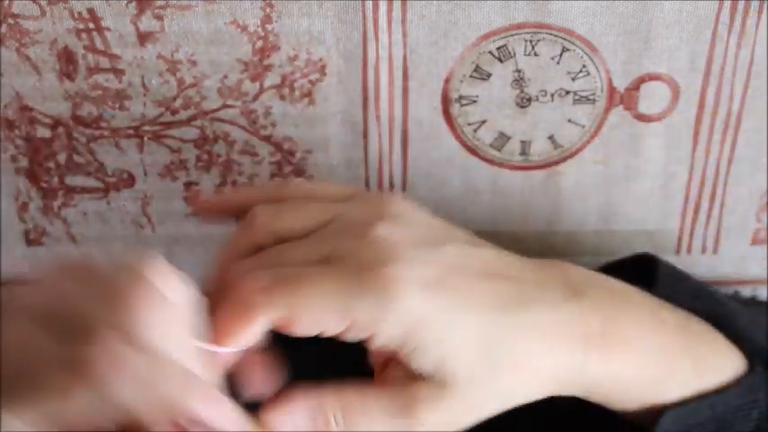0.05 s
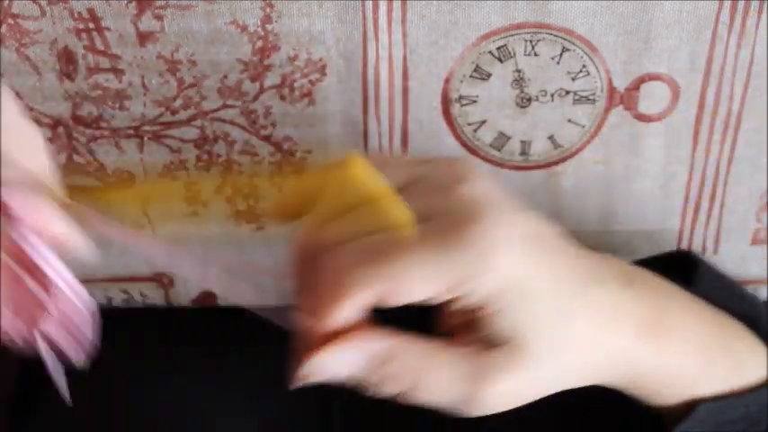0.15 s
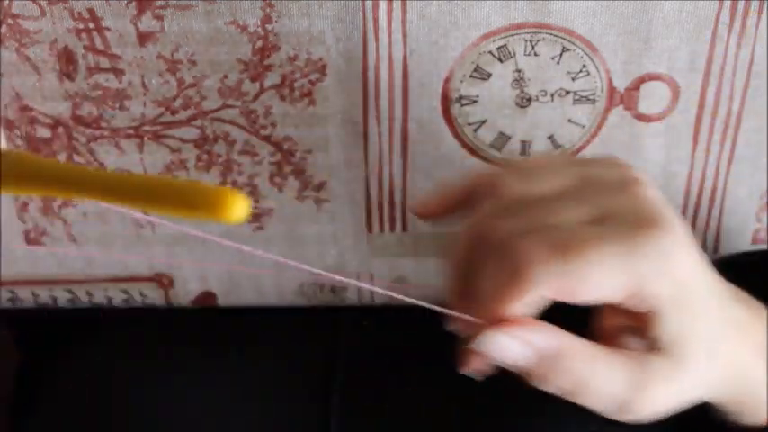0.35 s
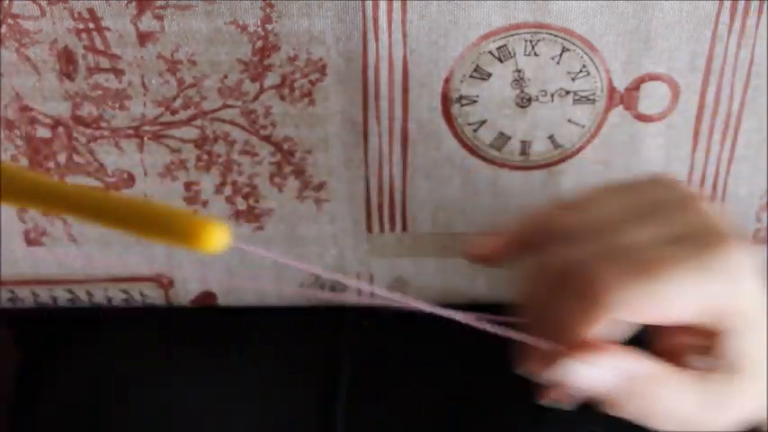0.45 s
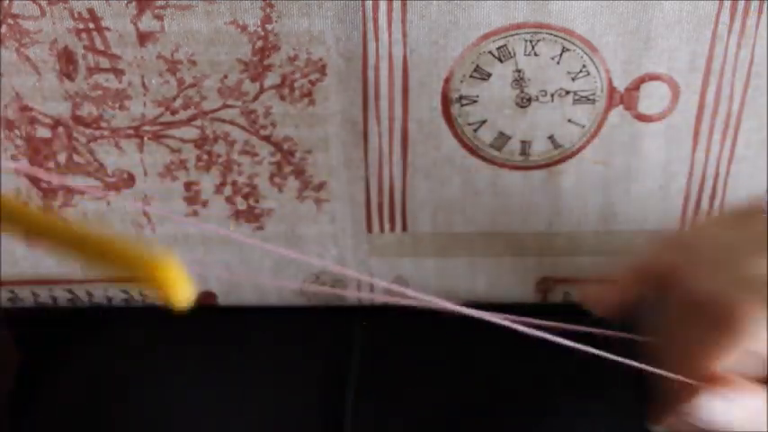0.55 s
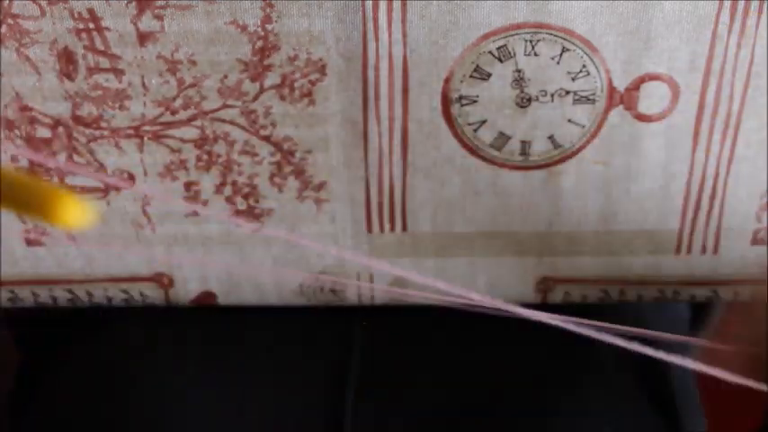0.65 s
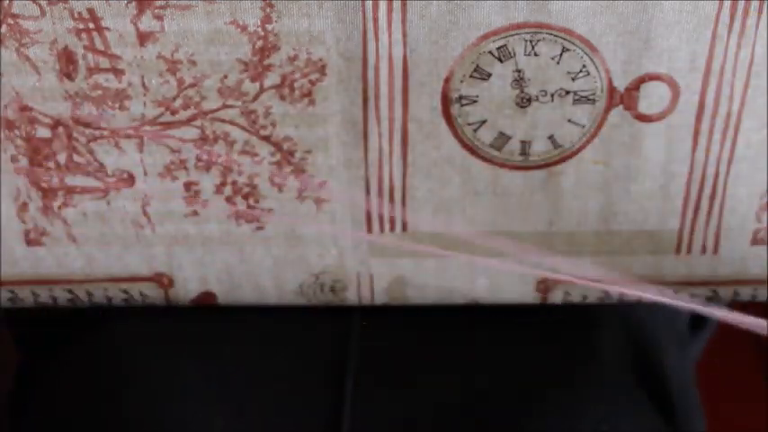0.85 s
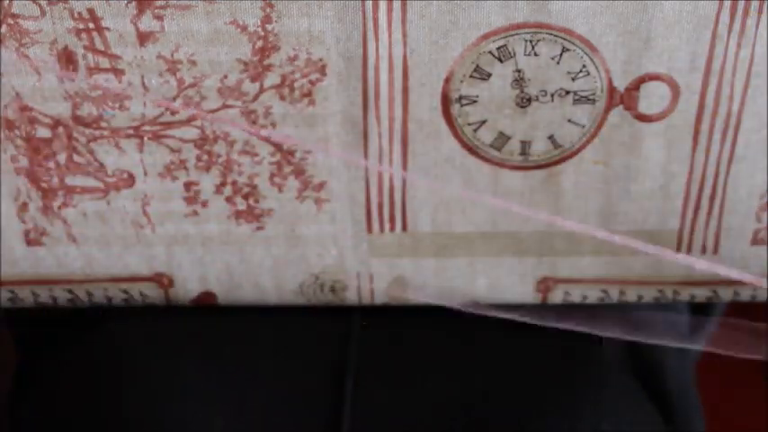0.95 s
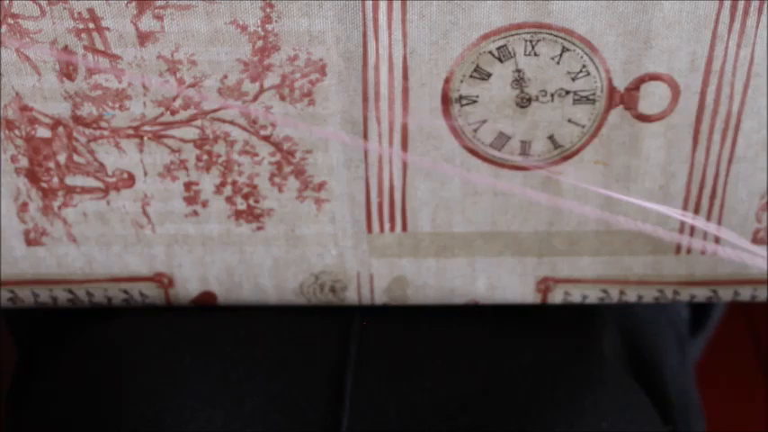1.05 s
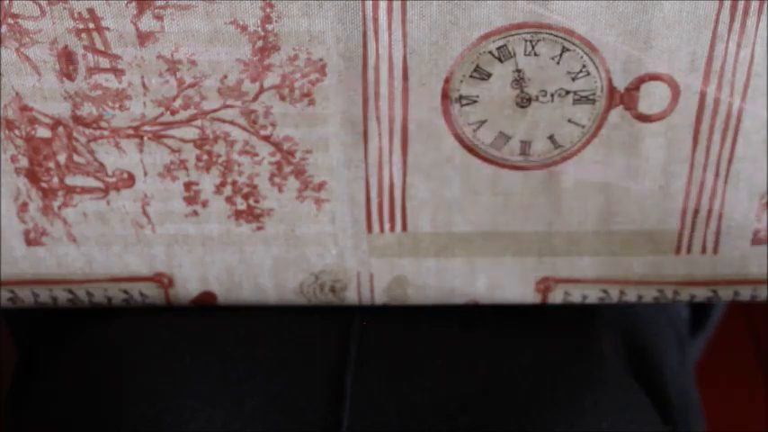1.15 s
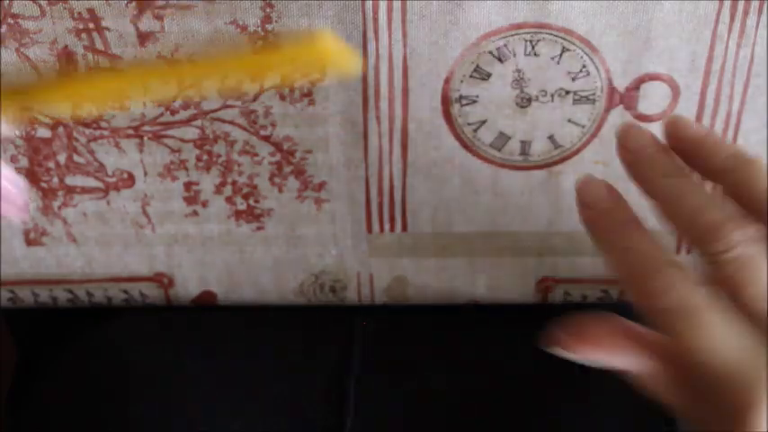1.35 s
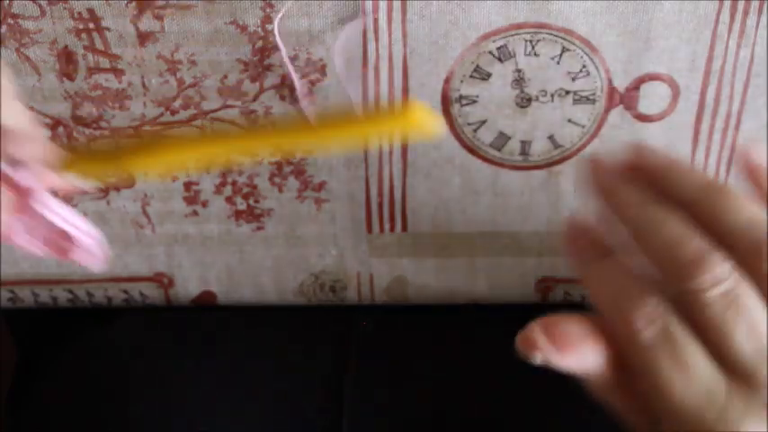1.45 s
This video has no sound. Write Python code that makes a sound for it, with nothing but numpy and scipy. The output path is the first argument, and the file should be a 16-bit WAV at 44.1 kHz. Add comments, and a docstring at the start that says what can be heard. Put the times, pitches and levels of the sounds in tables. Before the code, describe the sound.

Hands bump a cloth-covered table with dull thuds that grow weaker, while yarn slides softly through the fingers. A crochet hook clicks faintly near the end, over the steady hiss of a small room.

```python
"""Yarn is pulled off a ball at a cloth-covered table in a small room.
From the start, over steady hiss, the strand rubs softly through the fingers. Skin and yarn scuff the
cloth and the crochet hook ticks faintly. From a quarter second on, hands bump the table: dull thuds
that the walls throw back and the room's low modes hold. The bumps grow weaker, the pull fades,
and near the end the hook gives its clearest clicks."""
import sys
import numpy as np
from scipy import signal
from scipy.fft import rfft, irfft
from scipy.io import wavfile
from scipy.ndimage import uniform_filter1d

SR = 44100
rng = np.random.default_rng(int(sys.argv[2]) if len(sys.argv) > 2 else 0)


def waveform_to_disk(signal):
    """Save audio, clipped to [-1, 1], as 16-bit WAV at the path in sys.argv[1]."""
    frames = np.transpose(np.atleast_2d(signal))
    scaled = np.clip(frames, -1, 1) * 32767
    samples = np.round(scaled).astype(np.int16)
    wavfile.write(sys.argv[1], SR, samples)


N = 66150


def amp(db):
    """Decibels to gain."""
    return 10 ** (np.asarray(db) / 20)


def unit(x):
    """Scales to an rms of one."""
    return x / np.sqrt(np.mean(x ** 2) + 1e-20)


def read(points, hz):
    """Reads a table on a log-frequency axis."""
    f, value = np.transpose(points)
    return np.interp(np.log(hz + 1), np.log(f + 1), value)


def level(points):
    """A fader ride: gain over time from (t/s, level/dB) points."""
    return amp(np.interp(np.arange(N) / SR, *np.transpose(points)))


def add(mix, s, sound):
    """Mixes a sound in at time s."""
    part = mix[max(round(s * SR), 0):][:len(sound)]
    part += sound[:len(part)]


def noise(colour):
    """Steady noise with the given spectrum."""
    gain = amp(read(colour, np.fft.rfftfreq(N, 1 / SR)))
    return unit(irfft(rfft(rng.standard_normal(N)) * gain, N))


# Tone of the room's air: f/Hz, level/dB
HISS_COLOUR = [(15, -43), (28, -20), (42, 2.5), (60, 2.5), (100, 0), (150, -8), (210, -4.5), (300, -6),
               (550, -7.5), (820, -6.5), (1400, -14), (2500, -20.5), (4200, -21.5), (7000, -29),
               (12000, -36.5), (15500, -41.5)]
# Its fader ride: t/s, level/dB
HISS_LEVEL = [(0, -52.5), (.8, -51.5), (1.15, -52.5), (1.5, -50)]


def hiss():
    """The room's air lays a steady bed of dark noise."""
    return level(HISS_LEVEL) * noise(HISS_COLOUR)


# Swell and fade of the pull: t/s, level/dB
YARN_LEVEL = [(0, -62), (.1, -59.5), (.2, -58.5), (.42, -56), (.55, -55.5), (.7, -57), (.9, -57.5),
              (1.08, -57.5), (1.18, -65.5), (1.5, -69.5)]
# Airy tone of the sliding strand: f/Hz, level/dB
YARN_COLOUR = [(300, -28), (1200, -3), (2500, 6), (4500, 1.5), (7000, 0.5), (10000, -1), (13000, -4.5),
               (15500, -12)]


def yarn():
    """The strand rubs through the fingers in one long pull."""
    return level(YARN_LEVEL) * fibres(YARN_COLOUR)


def fibres(colour, grain_s=0.0015, grain_db=1.5):
    """Catching fibres give friction noise a fine grain."""
    grain = unit(uniform_filter1d(rng.standard_normal(N), max(round(grain_s * SR), 1)))
    return unit(noise(colour) * amp(grain_db * grain))


# Scuff cues: t/s, level/dB, attack/s, decay/s
SCUFFS = [(0.121, -53.5, 0.0096, 0.01), (0.2407, -42, 0.0011, 0.009), (.326, -50, 0.011, 0.045),
          (0.3291, -43.5, 0.0013, 0.0038), (1.236, -52, .005, 0.005), (1.459, -50.5, 0.0085, 0.024)]
# Tone of the rubbed cloth: f/Hz, level/dB
CLOTH_COLOUR = [(200, -12), (700, 10.5), (1300, 7.5), (1900, 7.5), (2800, 1.5), (4700, 6), (6000, 0),
                (10000, -4), (15500, -49)]


def cloth_scuffs(wet_db=-5):
    """Skin and yarn brush the cloth in short strokes that rise and die away."""
    t, pressure = np.arange(SR // 2) / SR, np.zeros(N)
    for s, db, attack, decay in SCUFFS:
        envelope = np.minimum(t / attack, 1) * np.exp(-np.maximum(t - attack, 0) / decay)
        add(pressure, s, amp(db) * envelope)
    scuffs = pressure * fibres(CLOTH_COLOUR)
    return scuffs + amp(wet_db) * room_tail(scuffs)


# Reverb time of the room: f/Hz, t60/s
ROOM_T60 = [(100, 0.28), (300, 0.62), (600, 0.38), (1200, 0.9), (4000, 0.32), (12000, 0.1)]


def room_tail(x, predelay_s=0.0084):
    """Diffuse reverb fades in, then each band dies at its own speed."""
    hz, t, bands = signal.stft(rng.standard_normal(SR), SR, nperseg=256)
    bands = bands * np.exp(-np.log(1000) * t / read(ROOM_T60, hz)[:, None])
    tail = signal.istft(bands, SR, nperseg=256)[1]
    tail = tail * np.clip(np.arange(len(tail)) / SR / predelay_s - .5, 0, 1)
    return signal.fftconvolve(x, tail / np.linalg.norm(tail))[:N]


# Click cues: t/s, level/dB
CLICKS = [(.1285, -44), (.1315, -44), (.1385, -49), (1.3982, -49), (1.4093, -43), (1.4107, -31),
          (1.4135, -40), (1.4372, -37), (1.4822, -47)]
# Ring of the hook: f/Hz, level/dB, t60/s
HOOK_MODES = [(2950, -11, .01), (3830, 0, .011), (4440, -18, .04), (8500, -15, .005)]


def hook_clicks(snap_db=-11, snap_decay_s=0.0009, wet_db=-6):
    """Each tap of the hook is a tiny snap of noise and a short, bright ring."""
    t, clicks = np.arange(SR // 20) / SR, np.zeros(N)
    for s, db in CLICKS:
        snap = amp(snap_db) * rng.standard_normal(len(t)) * np.exp(-t / snap_decay_s)
        add(clicks, s, amp(db) * (ring(HOOK_MODES, t) + snap))
    clicks = soften(radiate(clicks, hz=2370), hz=10400, order=10)
    return clicks + amp(wet_db) * room_tail(clicks)


def ring(modes, t):
    """A struck body rings as decaying sines."""
    return sum(amp(db) * np.exp(-np.log(1000) * t / t60) * np.sin(2 * np.pi * hz * t)
               for hz, db, t60 in modes)


def radiate(x, hz):
    """An object's slow motion pushes little air, so the lows roll off below hz."""
    return signal.sosfilt(signal.butter(3, hz, "highpass", fs=SR, output="sos"), x)


def soften(x, hz, order=4):
    """A soft contact excites nothing far above hz."""
    return signal.sosfilt(signal.butter(order, min(hz, SR / 4), fs=SR, output="sos"), x)


# Bump cues: t/s, level/dB, contact cutoff/Hz, sway trim/dB, room mode send/dB
BUMPS = [(0.2438, -13.5, 876, -2, 3), (0.3303, -15.5, 540, 4, -5.5), (0.5150, -24.5, 435, 7.5, 0.5),
         (0.579, -35, 416, -11, -9), (0.648, -44.5, 260, 20, -2), (0.695, -38, 270, 14.5, -3),
         (0.8420, -21.5, 197, 7.5, -0.5), (1.029, -47.5, 202, 13, 7), (1.229, -38.5, 165, 7, -7)]
# Knock of the table top: f/Hz, level/dB, t60/s
TABLE_MODES = [(228, 2, 0.031), (353, -12.5, 0.044), (395, -21, .06), (547, -15, 0.06), (708, -25, 0.08),
               (784, -30.5, 0.14)]
# Low boom of the room: f/Hz, level/dB, t60/s
ROOM_MODES = [(121, -15, .35), (182, -11, .42), (219.5, -12, .42), (242.5, -10, .48), (277, -20, .38),
              (323.5, -17, .38), (350, -26, .32), (425, -24, .4), (473, -16, .2), (519, -25, .2),
              (572, -22, .22), (788, -29, .2), (822, -22, .18)]
# Early reflections off the walls: delay/s, level/dB
WALL_ECHOES = [(.0165, -33), (.0327, -5.5), (.049, -9), (.0654, -18.5)]
SWAY_HZ, SWAY_T60_S, SWAY_DB = 106.3, 0.073, -15
SWAY_BUILD_S, BOOM_BUILD_S = 0.02, 0.013


def table_bumps(low_cut_hz=166, knock_wet_db=-2.5, sway_wet_db=-10):
    """Soft blows ring the table and set it swaying; walls echo the knocks and room modes linger."""
    t = np.arange(SR) / SR
    knock = radiate(ring(TABLE_MODES, t), low_cut_hz)
    sway = ring([(SWAY_HZ, 0, SWAY_T60_S)], t) * (1 - np.exp(-t / SWAY_BUILD_S))
    sway = radiate(sway, hz=66.6)
    boom = ring(ROOM_MODES, t) * (1 - np.exp(-t / BOOM_BUILD_S))
    boom = radiate(boom, low_cut_hz)
    knocks, sways, room = np.zeros((3, N))
    for s, db, contact_hz, trim_db, send_db in BUMPS:
        add(knocks, s, amp(db) * soften(knock, contact_hz))
        add(sways, s, amp(db + SWAY_DB + trim_db) * sway / abs(sway).max())
        add(room, s, amp(db + send_db) * soften(boom, contact_hz))
    for delay, db in WALL_ECHOES:
        add(room, delay, amp(db) * knocks)
    reverb = amp(knock_wet_db) * room_tail(knocks) + amp(sway_wet_db) * room_tail(sways)
    return knocks + sways + room + reverb


def scene():
    """The mono mix: hiss and yarn as the bed, bumps up front, scuffs and clicks as detail."""
    return (hiss() + yarn() + table_bumps() + cloth_scuffs() + hook_clicks())[None]


def record(dry):
    """A steep high cut trims the very top of the mix."""
    cutoff_hz = 15650
    taps = signal.firwin(511, cutoff_hz, window=("kaiser", 9), fs=SR)
    return signal.oaconvolve(dry, taps[None], "same")


dry = scene()
out = record(dry)
waveform_to_disk(out)
```